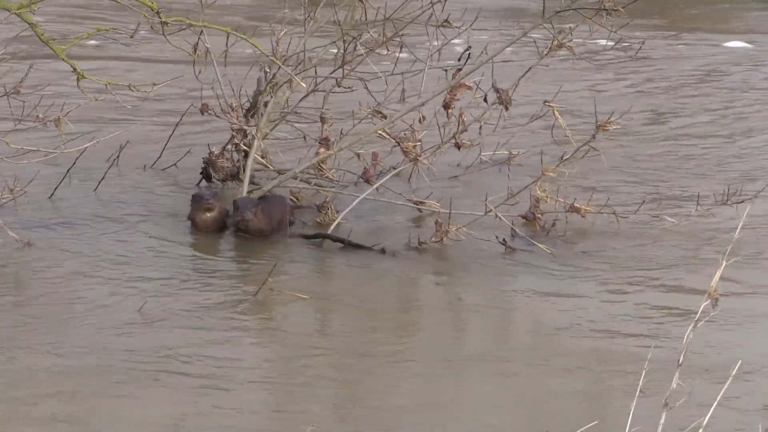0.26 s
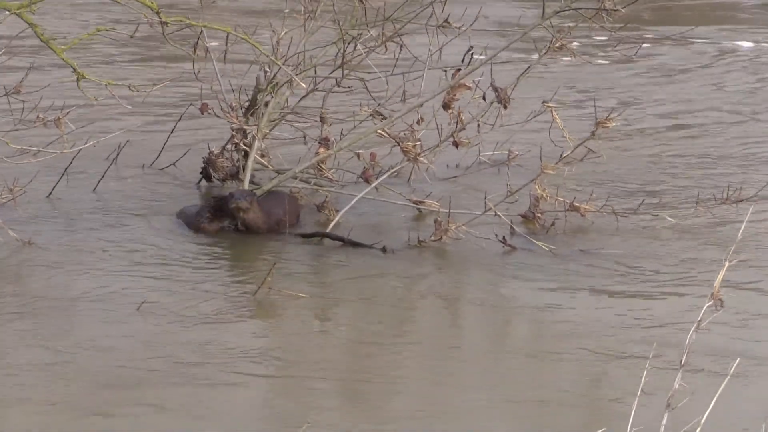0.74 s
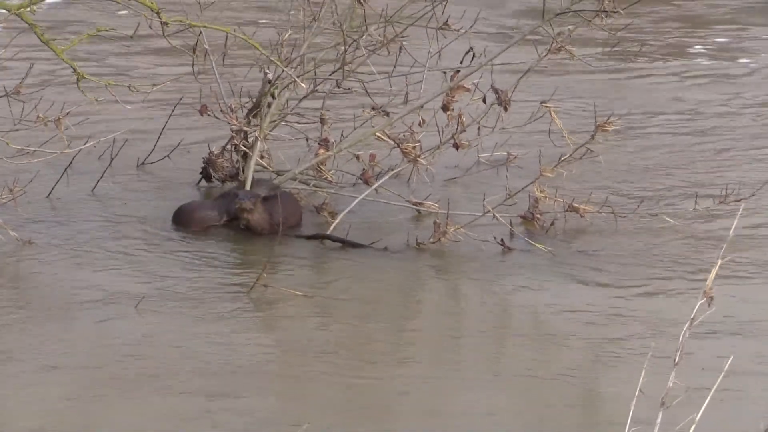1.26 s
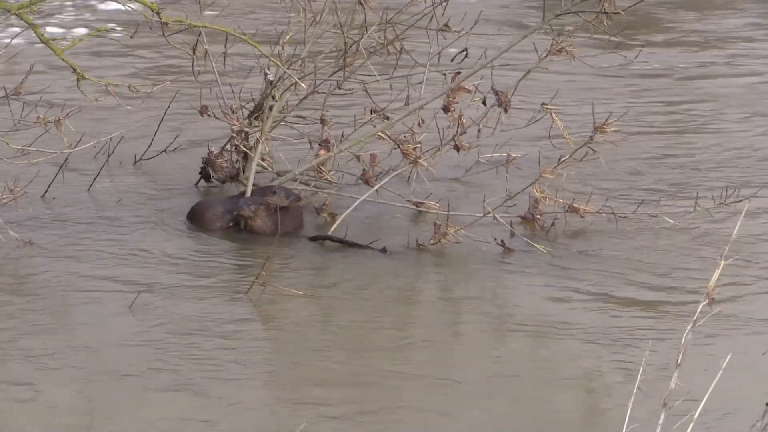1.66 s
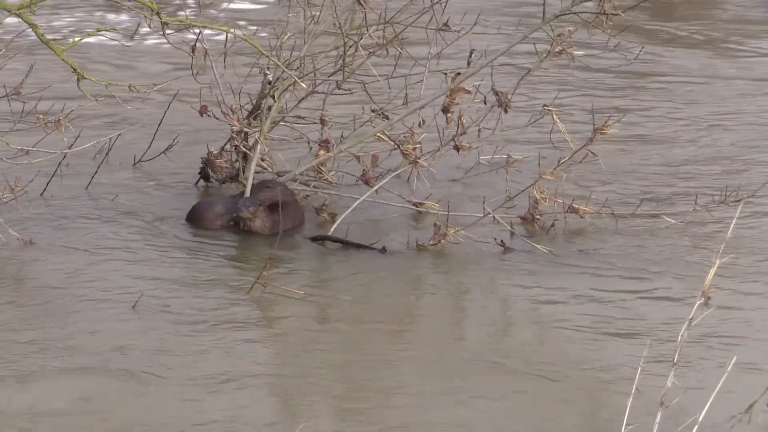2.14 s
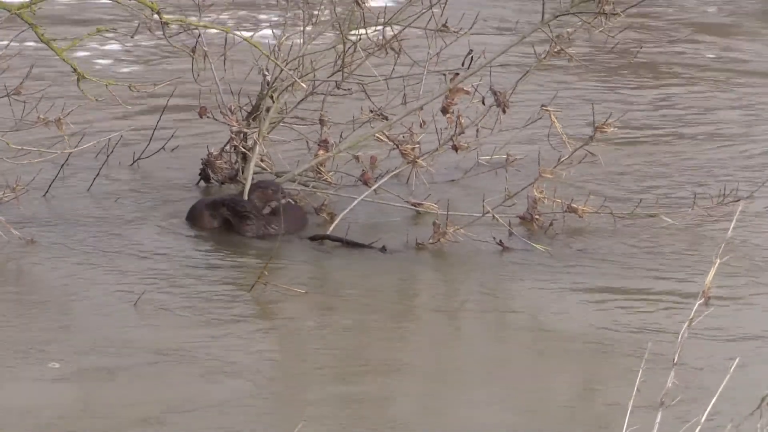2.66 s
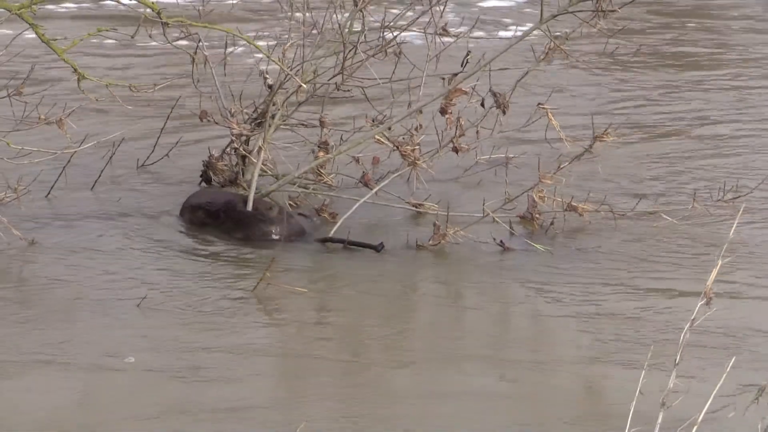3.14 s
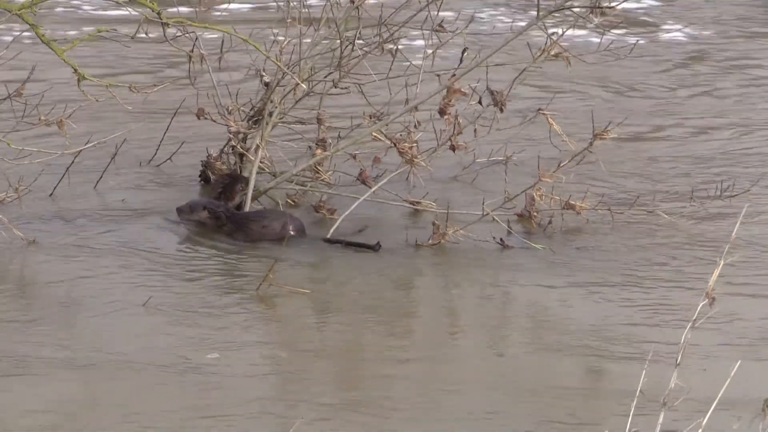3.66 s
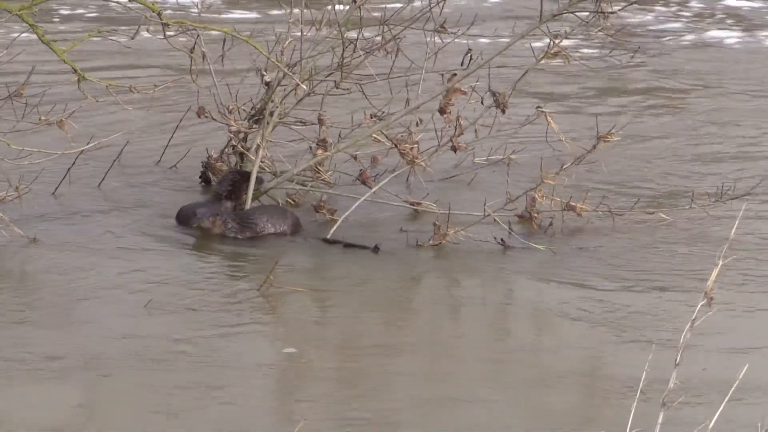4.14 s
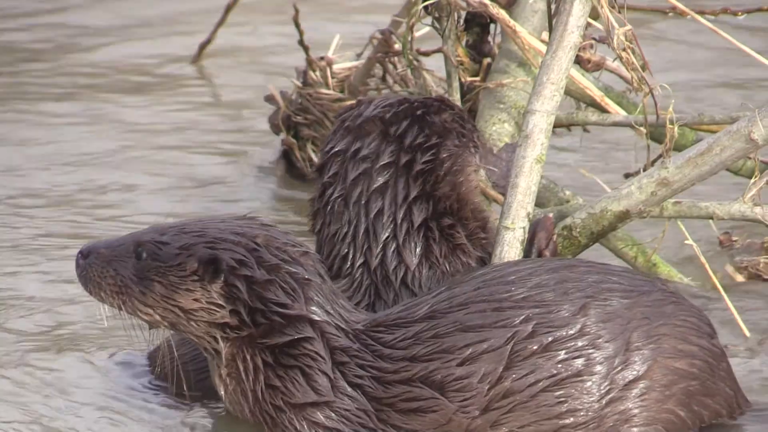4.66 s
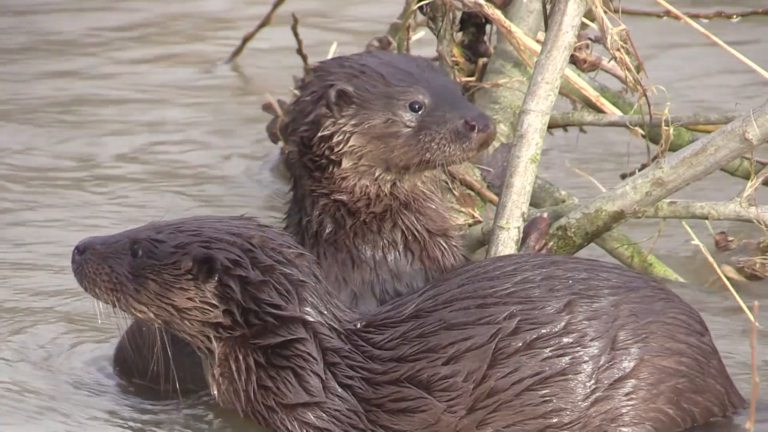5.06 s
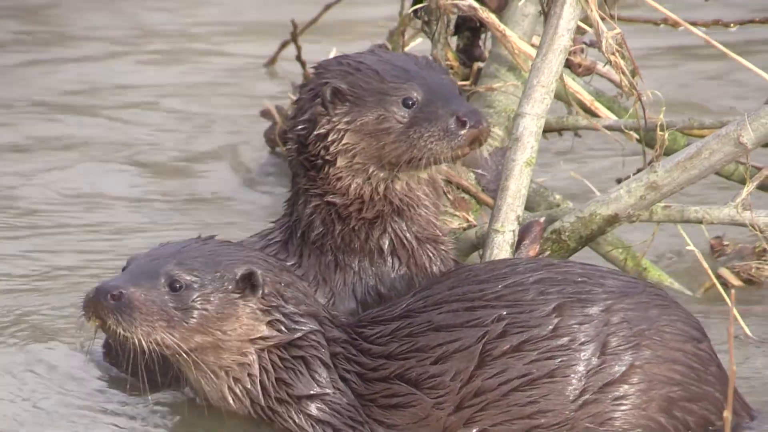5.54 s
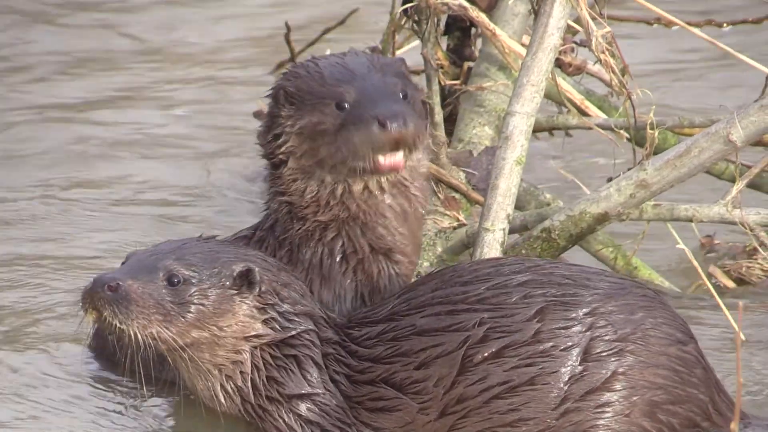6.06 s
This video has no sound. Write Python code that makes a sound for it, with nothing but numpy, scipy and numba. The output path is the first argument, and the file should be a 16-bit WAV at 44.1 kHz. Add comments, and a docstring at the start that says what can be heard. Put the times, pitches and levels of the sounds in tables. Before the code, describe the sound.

Steady, dull rushing of a swollen river fills the stereo outdoors. Over it, young otters whistle piercingly every half second or so, some squeaks bright and loud, others faint with more echo than body. Small wavelets slap twigs, fine ticks and bubbles sparkle, and low wind buffets the microphone early on. After quieter calls, one very loud squeak bursts out just past six seconds, overlapped by a weaker one.

```python
"""A bush standing in a flooded river, wooded banks around: two young otters whistle close to the microphone.
Each squeak is a sine on an arch of pitch with its octave, breaking from a thin whistle into a loud core, and
rings on along the banks as decaying noise echoes; at moments the ringing swells. Filtered noise makes the
river's rush, high ticks, slaps, short rasps and the wind on the microphone; short rising rings make bubbles;
wavering sines make far hums, a far bird's note and low plops of water. A limiter ducks everything under the
loudest squeak."""
import sys
import numpy as np
from scipy import signal
from scipy.fft import rfft, irfft, next_fast_len
from scipy.io import wavfile
from scipy.ndimage import uniform_filter1d
from numba import njit

SR = 44100
rng = np.random.default_rng(int(sys.argv[2]) if len(sys.argv) > 2 else 0)


def output_pcm(signal):
    """Save a mono or channel-first signal as 16-bit PCM at the path in sys.argv[1].

    Samples are clipped to [-1, 1] before scaling.
    """
    pcm = np.clip(np.atleast_2d(signal).T, -1, 1) * 32767
    wavfile.write(sys.argv[1], SR, np.round(pcm).astype(np.int16))


N = 278271
T = np.arange(N) / SR  # s
LEFT_RIGHT = np.array([[1], [-1]])  # sign of each channel

# The river's colour. Each row: frequency in Hz, relative density in dB per Hz.
RIVER_COLOUR = [(20, -12), (70, 13), (125, 5.5), (190, 4.5), (300, 0.5), (480, 0), (750, 0.5), (1300, -3.5),
                (2000, -10), (3000, -17.5), (4500, -24.5), (7500, -31), (10000, -37.5), (14000, -40.5)]
# The river's width across the two channels. Each row: frequency in Hz, side minus mid in dB.
RIVER_WIDTH = [(60, -31), (250, -10), (550, -14), (1200, -10), (2500, -8), (6000, -4), (12000, 1)]
# The rush as it swells and eases. Each row: time in s, level of its 300-3000 Hz middle in dB.
RUSH_LEVEL = [(0, -35), (.1, -32), (.4, -31.5), (1.25, -33), (1.73, -32.5), (2.02, -33), (2.15, -34.5),
              (2.3, -34), (3.17, -33), (3.74, -33.5), (6.05, -33)]
# Low hums from far away. Each row: start in s, end in s, pitch in Hz, mean level in dB.
FAR_HUMS = [(0, 6.4, 105.1, -35), (0, 6.4, 237.1, -46.5), (0, 5.8, 212.9, -49), (2.6, 4.18, 107.4, -34.5),
            (2.6, 5.6, 130.2, -39.5), (4.53, 6.9, 43.48, -37.5)]
# The breeze on the microphone, dying down. Each row: time in s, level in dB.
BREEZE = [(0, -22), (1.1, -26.5), (3.85, -24.5), (4.05, -33), (4.7, -38.5), (6.31, -37)]
# Gusts that thump on top of the breeze. Each row: time in s, level at the peak in dB.
GUSTS = [(.13, -15), (.41, -21), (1.42, -22.5), (1.7, -19.5), (1.88, -23), (2.26, -17), (2.55, -21.5),
         (2.9, -23), (3.17, -22), (3.57, -21.5), (3.74, -23)]
# The colour of the wind. Each row: frequency in Hz, relative density in dB per Hz.
WIND_COLOUR = [(10, -15), (22, 4.5), (45, 3), (80, -3.5), (130, -10), (200, -23.5), (400, -22.5),
               (2000, -101)]
# Brief ticks of high fizz, some at the end of a squeak.
# Each row: time in s, peak in dB relative to the ticks' common gain.
CLEAR_TICKS = [(.172, -41), (.19, -45), (.275, -35), (.299, -40), (.6818, -36), (.701, -44), (.788, -35),
               (1.5614, -34), (1.9345, -42), (2.042, -34.5), (2.553, -36), (2.66, -32.5), (3.4745, -42),
               (3.8142, -39), (4.0467, -36), (5.5324, -34), (5.6381, -36), (6.216, -24), (6.2716, -37)]
# Wavelets slapping lightly. Each row: time in s, peak in dB relative to the slaps' common gain, centre in Hz.
SLAPS = [(0.3293, -21, 2000), (1.199, -30, 1900), (1.472, -23.5, 1900), (1.562, -30, 1700),
         (2.5666, -31, 2100), (3.164, -35, 2100), (3.3243, -30, 1990), (3.7438, -28, 1900),
         (4.6115, -28, 2100), (5.156, -32, 2200), (5.223, -26.5, 1900), (5.9511, -32, 1590),
         (6.15, -23, 2600)]
# The squeaks. Each row: start in s, length in s, top pitch in Hz, quick scoop in Hz, slow climb in Hz, # place
# of the top 0-1, sag after it in Hz, full voice from s, full voice until s (both after the start), # its attack
# in s, its release in s, closing fade in s, thin whistle in dB, full voice in dB, octave in dB, # roughness in
# dB, left minus right in dB, the same for the octave in dB, send to the banks in dB. # The row at 4.468 s is
# barely heard itself: near 5.5 kHz, it sounds mostly as ringing from the banks.
SQUEAKS = [ (.421, 0.13, 6060, 640, 170, 0.65, 180, .018, .11, .004, .004, .005, -36.5, -70, -78, 2.5, 1.5, 4.5, -58),
           (0.565, 0.1, 5480, 170, 300, 0.64, 330, 0.043, .081, 0.0053, .0038, .012, -35, -11.2, -33, 1.5, 2.5, 6, -44),
           (1.358, .106, 5505, 330, 280, 0.59, 620, .042, 0.072, 0.0047, 0.006, .01, -31, -8.5, -34, 1.5, 2, 4, -44),
           (1.813, .12, 6040, 600, 20, 0.7, 248, 0.063, 0.096, 0.0039, 0.0025, .01, -35.5, -17.5, -81, 3, 2.4, 1, -40.5),
           (2.24, .1, 5453, 260, 300, 0.61, 171, 0.027, 0.076, 0.0029, 0.0068, 0.017, -39, -12.5, -21, 1.7, 2.5, 4.5, -42),
           (2.811, 0.12, 5953, 274, 300, 0.88, 120, 0.025, 0.087, 0.0015, 0.0017, 0.011, -34, -9.5, -29.5, 0.9, 0, 8.8, -40.5),
           (3.337, 0.1, 5366, 80, 310, 0.78, 200, 0.033, 0.098, .003, .002, .014, -50, -40, -38.5, 3.5, 4, 5.7, -52),
           (3.922, .118, 6005, 240, 410, 0.63, 170, .047, 0.069, 0.0065, .013, 0.018, -40, -14, -40, 2, 1.5, 6, -35),
           (4.441, .093, 5390, 150.4, 190, 0.63, 60, .033, .078, .00078, .0011, .012, -50, -16, -25, 2, 4, 5, -59),
           (4.468, 0.07, 5530, 100, 102, 0.66, 100, 0.035, 0.061, .003, .0047, .02, -60, -48, -54, 2.5, 2, 2, -35),
           (4.736, 0.13, 6055, 310, 330, 0.57, 330, 0.039, .11, .0062, .0017, .007, -40, -16.5, -39, 0.7, 2.5, 6, -35.5),
           (5.247, 0.12, 5544, 230, 160, 0.66, 230, 0.034, 0.085, .007, 0.014, 0.011, -45, -16, -24.5, 2, 5.6, 3, -36),
           (6.127, 0.12, 5986, 400, 180, .5, 300, .018, .094, 0.0036, 0.0038, 0.0086, -24.5, -0.8, -26.5, .6, 2, -1, -40),
           (6.188, 0.12, 5710, 250, 520, .56, 380, 0.069, 0.11, .005, .006, 0.013, -37, -31, -67, 2.5, 1, 1, -37.5)]
# Instants where the whistle dips. Each row: time in s, dip in dB, half length in s.
DIPS = [(0.522, -20, 0.0066), (3.392, -5, 0.0029), (4.475, -6.5, .008), (4.49, -18, 0.0072),
        (4.793, -11, 0.0095), (4.813, -7, 0.0068)]
# Echoes from the nearest bank. Each row: delay in s, level in dB, left minus right in dB.
NEAR_ECHOES = [(.014, -24, 20), (0.025, -27.5, -8), (.038, -34, 12)]
# Short rasps of noise near the ends of some squeaks. Each row: time in s, level in dB, half length in s.
RASPS = [(1.44, -38.5, .005), (2.91, -36, .0015), (4.518, -34.5, .004), (4.804, -41, 0.0073),
         (5.336, -44, 0.0089)]
# Gurgles of the water. Each row: time in s, centre in Hz, level of each bubble in dB.
GURGLES = [(1.7, 887, -29), (5.92, 760, -35), (6.085, 850, -29)]
# Faint notes: two low plops of water and, far off, a thin bird's whistle. # Each row: start in s, end in s,
# start pitch in Hz, end pitch in Hz, level at the middle in dB.
FAINT_NOTES = [(2.314, 2.368, 936, 974, -34.5), (3.157, 3.234, 695, 688, -33.5),
               (3.996, 4.182, 8400, 7850, -60)]
# Moments when the ringing swells. Each row: middle in s, delay of the squeak's tone in s, half length in s,
# level in dB.
RINGING_SWELLS = [(2.505, 0.19, 0.046, -6), (2.58, .29, .03, -11), (3.072, .2, 0.026, -18),
                  (3.2, .33, .04, -15), (3.55, 0.14, .04, -2), (4.612, .1, .018, 0), (4.916, .11, 0.02, -5),
                  (5.455, .15, 0.022, -0.5)]

GUST_S = 0.06  # half length of each gust
JITTER = .0026  # unsteadiness of the voice's pitch, rms share of it
SCOOP_S, DROP_HZ, DROP_S = .036, 1300, .005  # opening scoop of a squeak, steep drop of pitch at its end
OCTAVE_PEAK = 0.55  # place in a squeak (0-1) where the octave is strongest
OCTAVE_LAG_S = 0.0033  # the octave outlasts the full voice by this
TOP_HZ = 14400  # upper limit of the sound


def undb(db):
    """Decibels to gain."""
    return 10 ** (np.asarray(db) / 20)


def unit(x):
    """Scale to rms 1."""
    return x / np.sqrt(np.mean(x ** 2))


def curve(rows):
    """Rows of (s, value) joined by straight lines."""
    return np.interp(T, *np.transpose(rows))


def bell(centre_s, half_s):
    """A smooth swell and fall around one moment."""
    return np.exp(-((T - centre_s) / half_s) ** 2)


def delayed(x, delay_s):
    """The same sound, later."""
    return np.pad(x, (int(delay_s * SR), 0))[:N]


def at_hz(rows, hz):
    """Read rows of (Hz, value) on a log-frequency axis."""
    f, value = np.transpose(rows)
    return np.interp(np.log(np.maximum(hz, 1)), np.log(f), value)


def colour(x, rows):
    """Filter a sound by the curve (Hz, dB)."""
    size = next_fast_len(N)
    gain = undb(at_hz(rows, np.fft.rfftfreq(size, 1 / SR)))
    return irfft(rfft(x, size) * gain, size)[..., :N]


def band(x, lo_hz, hi_hz):
    """Band-pass."""
    edges = [lo_hz, min(hi_hz, SR / 2 - 1)]
    return signal.sosfilt(signal.butter(3, edges, "band", fs=SR, output="sos"), x)


def walk(rate):
    """Slow chance: random levels held 1 / rate s, smoothed twice, rms 1."""
    hold = max(int(SR / rate), 1)
    steps = np.repeat(rng.standard_normal(N // hold + 1), hold)
    return unit(uniform_filter1d(uniform_filter1d(steps, hold), hold)[:N])


def river(flicker_db=0.83):
    """Rushing water: noise in octaves, each flickering a little by itself, with its own width at each pitch."""
    water = 0
    for low_hz in 22 * 2. ** np.arange(10):
        flicker = undb(flicker_db * walk(22.134))
        water = water + flicker * band(rng.standard_normal((2, N)), low_hz, 2 * low_hz)
    mid, side = colour(water, RIVER_COLOUR)
    side = colour(side, RIVER_WIDTH)
    rush = np.std(band(mid, 300, 3000))
    return (mid + LEFT_RIGHT * side) / rush * undb(curve(RUSH_LEVEL))


def far_hum(drift=0.00969, waver_db=2, fade_s=0.052):
    """Faint hums from far away: sines that waver in pitch and level."""
    hum = 0
    for start, end, hz, db in FAR_HUMS:
        running = np.clip(np.minimum(T - start, end - T) / fade_s, 0, 1)
        phase = 2 * np.pi * np.cumsum(hz * (1 + drift * walk(8))) / SR
        level = np.sqrt(2) * undb(db + waver_db * walk(8.8))
        hum = hum + running * level * np.sin(phase)
    return hum


def wind(side_db=-4.5, eddy_db=1):
    """Eddies thump on the microphone, partly unlike on its two sides; gusts add their power to the breeze."""
    mid, side = (unit(colour(rng.standard_normal(N), WIND_COLOUR)) for _ in range(2))
    power = undb(curve(BREEZE)) ** 2
    power = power + sum(undb(db) ** 2 * bell(s, GUST_S) for s, db in GUSTS)
    eddies = undb(eddy_db * walk(15))
    return (mid + undb(side_db) * side * LEFT_RIGHT) * np.sqrt(power) * eddies


def plip(hz, cycles, glide):
    """One bubble: a brief decaying ring that rises in pitch."""
    t = T[:SR // 25]
    age = t * hz / cycles
    return np.exp(-age) * np.sin(2 * np.pi * hz * t * (1 + glide * np.tanh(age) / 2))


def bubbles(count=220, level_db=-43, scatter_db=2.5, low_hz=700, high_hz=2800, cycles=7, glide=0.088):
    """Small bubbles burst all over the current, the lower ones louder."""
    out = np.zeros((2, N + SR))
    for when, size, place, strength in rng.random((count, 4)):
        hz = low_hz * (high_hz / low_hz) ** size
        ring, i = plip(hz, cycles, glide), int(when * N)
        level = undb(level_db - scatter_db * np.log(1 - strength)) * np.sqrt(low_hz / hz)
        out[:, i:i + len(ring)] += level * ring * (1 + LEFT_RIGHT * (place - .5))
    return out[:, :N]


def ticks(per_s=25, small_db=-50, scatter_db=3, ring_s=0.0032, clear_db=3):
    """Many tiny ticks of water at the twigs and a few clear ticks, each a brief high fizz of noise."""
    hits = (rng.random(N) < per_s / SR) * undb(small_db + scatter_db * rng.standard_normal(N))
    for s, db in CLEAR_TICKS:
        hits[int(s * SR)] += undb(db + clear_db)
    t = T[:SR // 20]
    fizz = band(rng.standard_normal((2, len(t))) * np.exp(-t / ring_s), 3500, 13000)
    return signal.fftconvolve(hits[None], fizz / np.abs(fizz).max(), axes=1)[:, :N]


def slaps(level_db=-1, ring_s=0.0034):
    """Wavelets break on the branches, each a short, dull splash of decaying noise."""
    out = 0
    for s, db, hz in SLAPS:
        burst = rng.standard_normal(N) * (T >= s) * np.exp(-np.abs(T - s) / ring_s)
        splash = band(burst, hz / 2.5, hz * 1.44)
        out = out + undb(db + level_db) * splash / np.abs(splash).max()
    return out


def arch(t, length, top_hz, scoop_hz, climb_hz, crest, sag_hz):
    """Pitch of a squeak: quick scoop up, slow climb to the top, sag, and a last drop as the pressure goes."""
    u = t / length
    rise = np.maximum(1 - u / crest, 0)
    fall = np.maximum((u - crest) / max(1 - crest, .05), 0)
    scoop = np.maximum(1 - t / SCOOP_S, 0) ** 2
    drop = np.exp((t - length) / DROP_S)
    return top_hz - scoop_hz * scoop - climb_hz * rise ** 1.5 - sag_hz * fall ** 2 - DROP_HZ * drop


def otters(octave_flutter_db=3, rise_s=0.0047, air_db=-34.5, lead=0.41, octave_lead=-0.72, dome=3.15,
           thin_octave_db=-21):
    """Whistles with octave and breath: the sound straight over the water, and the sound sent to the banks."""
    direct, spread = np.zeros((2, N)), np.zeros(N)
    waver, octave_flutter = walk(450), walk(280)
    flutter = (walk(170) + walk(420)) / np.sqrt(2)
    dip_db = sum(db * bell(s, half_s) for s, db, half_s in DIPS)
    # air hisses in a skirt around each partial
    skirt = band(rng.standard_normal(N), 4200, 7260) + band(rng.standard_normal(N), 8700, 11300)
    air = undb(air_db) * unit(skirt)
    for (start, length, top_hz, scoop_hz, climb_hz, crest, sag_hz, full_from, full_until, attack, release,
         fade_s, thin_db, loud_db, octave_db, rough_db, pan_db, octave_pan_db, bank_db) in SQUEAKS:
        i = np.flatnonzero((T >= start) & (T < start + length))
        t = T[i] - start
        hz = arch(t, length, top_hz, scoop_hz, climb_hz, crest, sag_hz) * (1 + JITTER * waver[i])
        phase = 2 * np.pi * np.cumsum(hz) / SR
        gate = np.minimum(t / rise_s, 1) * np.minimum((length - t) / fade_s, 1)
        # the thin whistle breaks into full voice, which gives out again
        core = 1 / (1 + np.exp((full_from - t) / attack)) / (1 + np.exp((t - full_until) / release))
        rough = undb(rough_db * flutter[i])
        effort = (undb(thin_db) + core * undb(loud_db)) * undb(dip_db[i]) * rough
        # each partial reaches the two microphone ports a little out of step (lead in radians)
        tone = effort * undb(LEFT_RIGHT * pan_db / 2) * np.sin(phase + LEFT_RIGHT * lead / 2)
        # the octave swells over the squeak and gives out just after the full voice
        swell = np.exp(-dome * (2 * (t / length - OCTAVE_PEAK)) ** 2)
        swell = swell / (1 + np.exp((t - full_until - OCTAVE_LAG_S) / release))
        brightness = swell * undb(octave_db) + undb(thin_db + thin_octave_db)
        brightness = brightness * undb(octave_flutter_db * octave_flutter[i])
        octave = np.sin(2 * phase + LEFT_RIGHT * octave_lead / 2)
        octave = brightness * undb(LEFT_RIGHT * octave_pan_db / 2) * octave
        # the louder, brighter and rougher a squeak, the more air goes with it
        hiss = rough_db * undb((loud_db + octave_db + LEFT_RIGHT * pan_db) / 2) * core * air[i]
        direct[:, i] += np.sqrt(2) * gate * (tone + octave + hiss)
        # the send to the banks has its own level, whatever the direct loudness
        call = np.sin(phase) + undb(-23.5) * np.sin(2 * phase)
        spread[i] += np.sqrt(2) * undb(bank_db) * gate * core ** 0.73 * rough * call
    return direct, spread


def near_bank(x):
    """Short echoes from the nearest bank; they beat against the falling end of each squeak."""
    mono = x.mean(axis=0)
    return sum(undb(db + LEFT_RIGHT * pan_db / 2) * delayed(mono, delay_s)
               for delay_s, db, pan_db in NEAR_ECHOES)


def banks(x, t60_s=1.0, build_s=0.04, level_db=-3, flutter_db=1.4, flutter_per_s=90):
    """Countless weak echoes from trees and banks, as decaying noise, hold each squeak's top note and flutter."""
    t = T[:SR]
    envelope = (1 - np.exp(-t / build_s)) * np.exp(-np.log(1000) * t / t60_s)
    mid, side = rng.standard_normal((2, SR)) * envelope
    echoes = (mid + 0.69 * side * LEFT_RIGHT) / np.sqrt(np.sum(mid ** 2))
    ringing = signal.fftconvolve(x[None], echoes, axes=1)[:, :N]
    return undb(level_db + flutter_db * walk(flutter_per_s)) * ringing


def rasps(low_hz=4700, high_hz=6900, octave_db=-10):
    """Short rasps near the ends of some squeaks: noise around the whistle and its octave."""
    noise = rng.standard_normal(N)
    rasp = unit(band(noise, low_hz, high_hz)) + undb(octave_db) * unit(band(noise, 8400, 12200))
    return rasp * sum(undb(db) * bell(s, half_s) for s, db, half_s in RASPS)


def gurgles(count=8, length_s=.05, octaves=1, cycles=6, glide=0.15):
    """An eddy folds air under: a quick huddle of larger bubbles."""
    out = np.zeros(N + SR)
    for s, centre_hz, db in GURGLES:
        for when, size in rng.random((count, 2)):
            ring = plip(centre_hz * 2 ** (octaves * (size - .5)), cycles, glide)
            i = int((s + when * length_s) * SR)
            out[i:i + len(ring)] += undb(db) * ring
    return out[:N]


def faint_notes(waver=0.0059):
    """Brief gliding sines that swell and sink, barely rising out of the rush: two low plops of water and a far
    bird."""
    notes = 0
    for start, end, start_hz, end_hz, db in FAINT_NOTES:
        u = np.clip((T - start) / (end - start), 0, 1)
        hz = (start_hz + (end_hz - start_hz) * u) * (1 + waver * walk(74))
        swell = 2 * np.sqrt(2 * u * (1 - u))
        notes = notes + swell * undb(db) * np.sin(2 * np.pi * np.cumsum(hz) / SR)
    return notes


def ringing_swells(x):
    """At moments the ringing swells: a delayed piece of the squeak's tone under a bell."""
    return sum(undb(db) * bell(s, half_s) * delayed(x, delay_s) for s, delay_s, half_s, db in RINGING_SWELLS)


def scene():
    """Otters and their ringing over the river, with wind on the microphone and faint sounds from afar."""
    direct, spread = otters()
    ringing = near_bank(direct) + banks(spread) + ringing_swells(spread)
    water = river() + bubbles() + slaps() + gurgles()
    return direct + rasps() + ringing + water + ticks() + wind() + far_hum() + faint_notes()


@njit
def follow(x, attack, release):
    """Envelope that rises quickly and sinks slowly."""
    out, e = np.empty(len(x)), 0.
    for i in range(len(x)):
        e += (x[i] - e) * (attack if x[i] > e else release)
        out[i] = e
    return out


def record(dry, ceiling=0.81, attack_s=0.00013, release_s=0.024):
    """A limiter holds the loudest squeak down, and the river with it; a steep low-pass cuts the top."""
    peak = follow(np.abs(dry).max(axis=0), 1 / (1 + attack_s * SR), 1 / (1 + release_s * SR))
    held = dry * ceiling / np.maximum(peak, ceiling)
    return signal.sosfilt(signal.ellip(8, .2, 70, TOP_HZ, fs=SR, output="sos"), held)


dry = scene()
out = record(dry)
output_pcm(out)
```